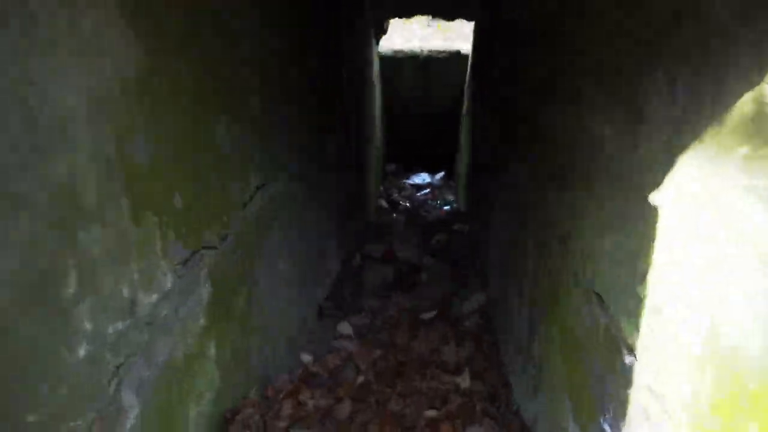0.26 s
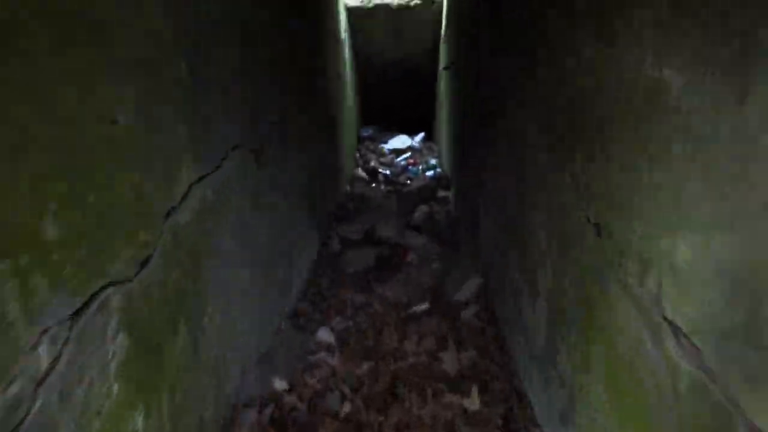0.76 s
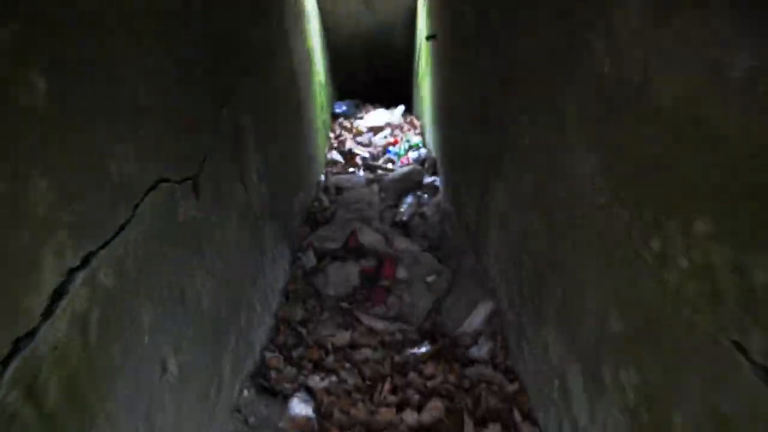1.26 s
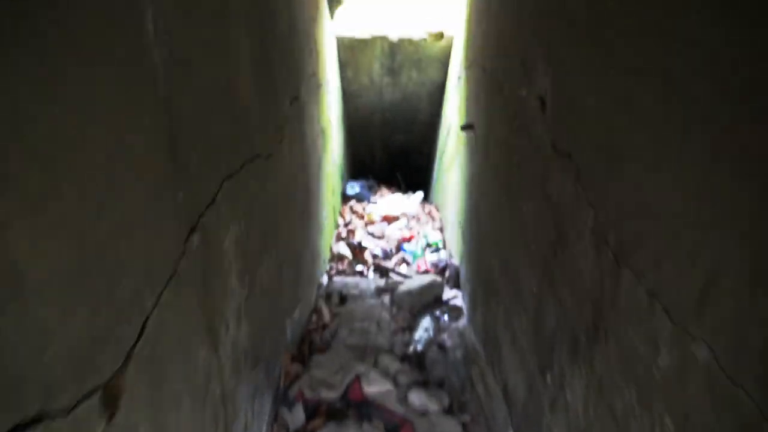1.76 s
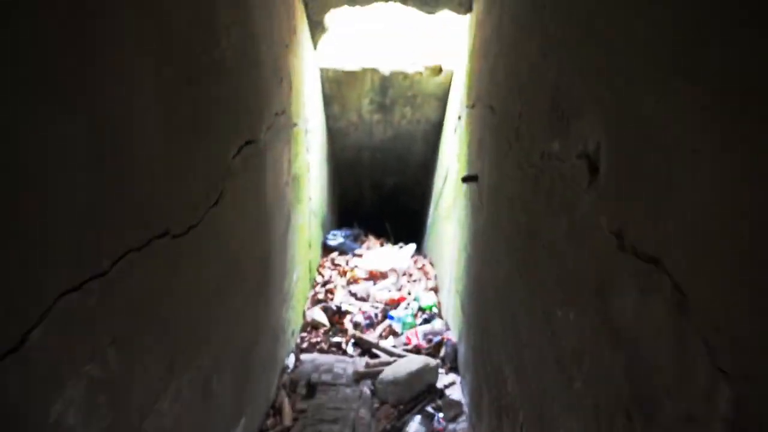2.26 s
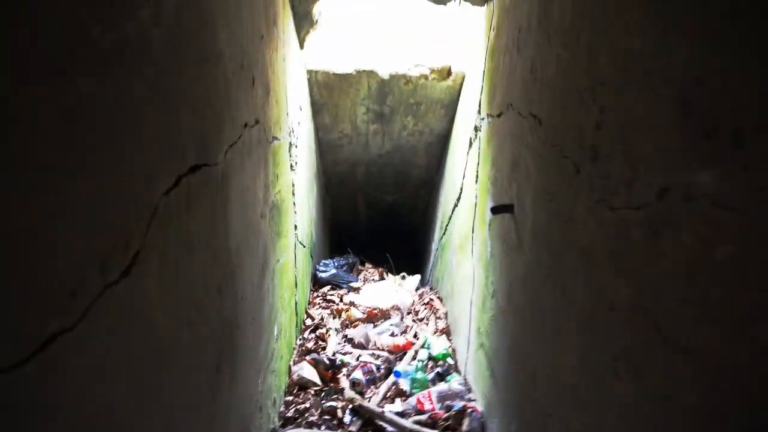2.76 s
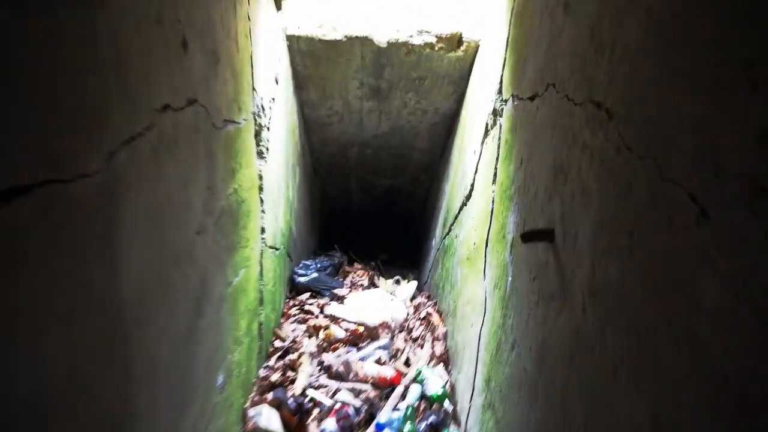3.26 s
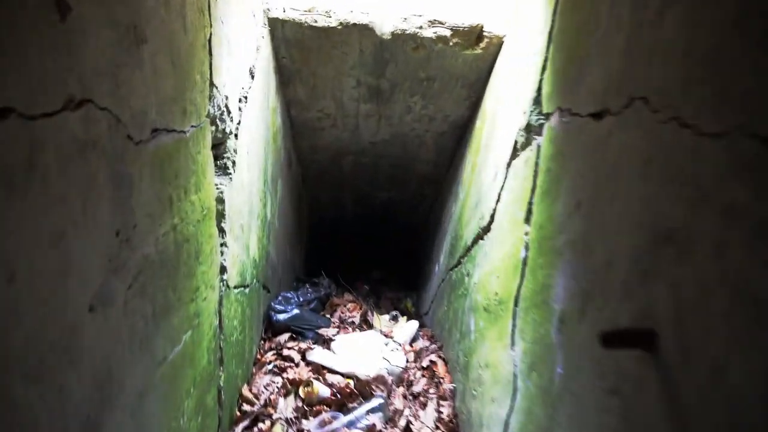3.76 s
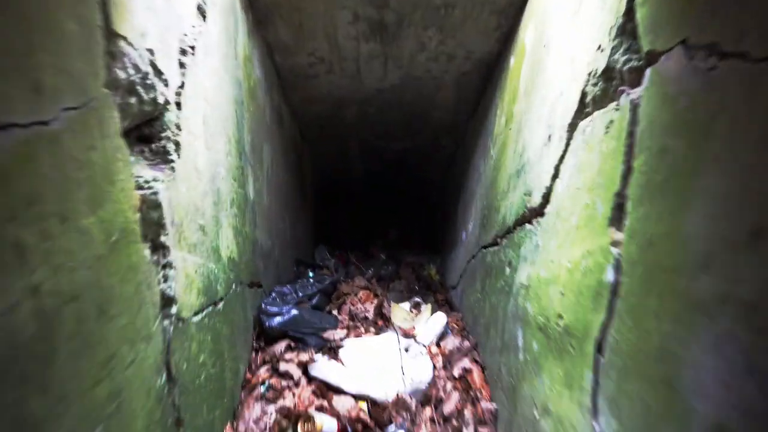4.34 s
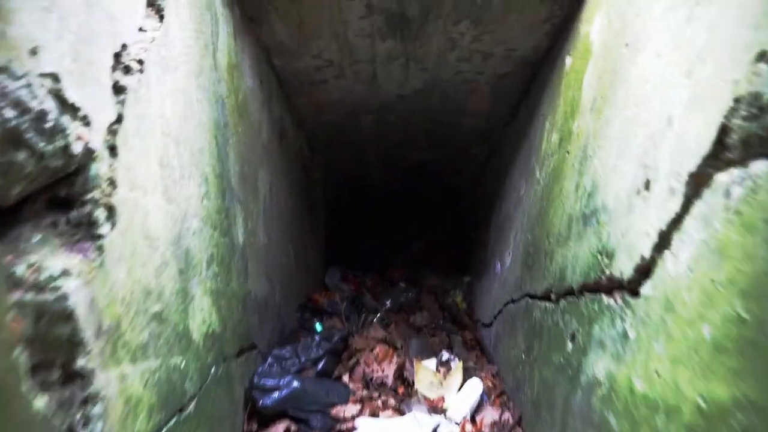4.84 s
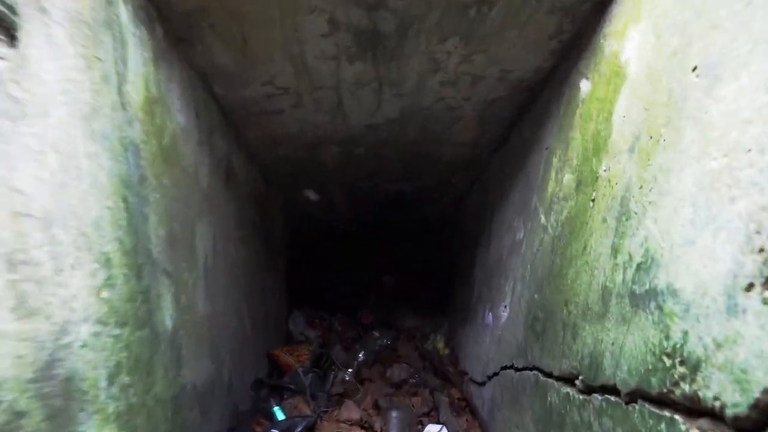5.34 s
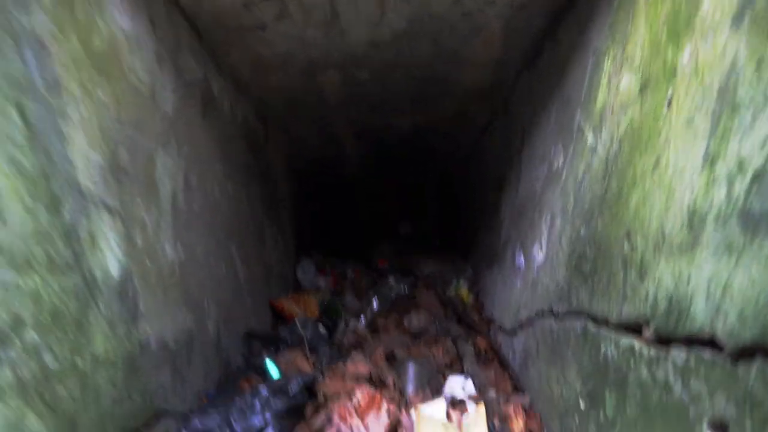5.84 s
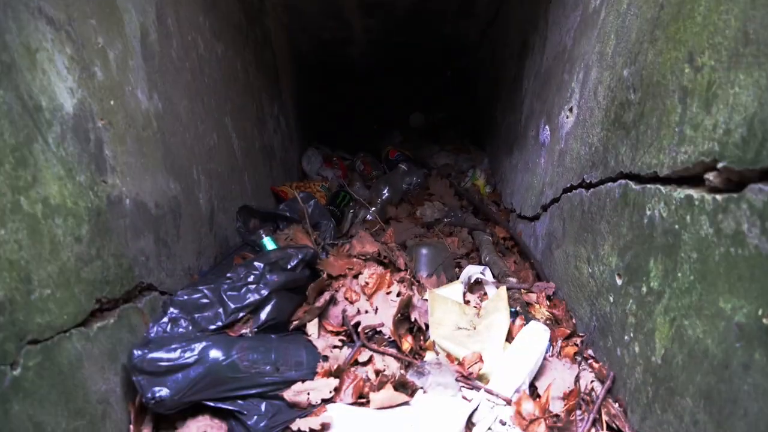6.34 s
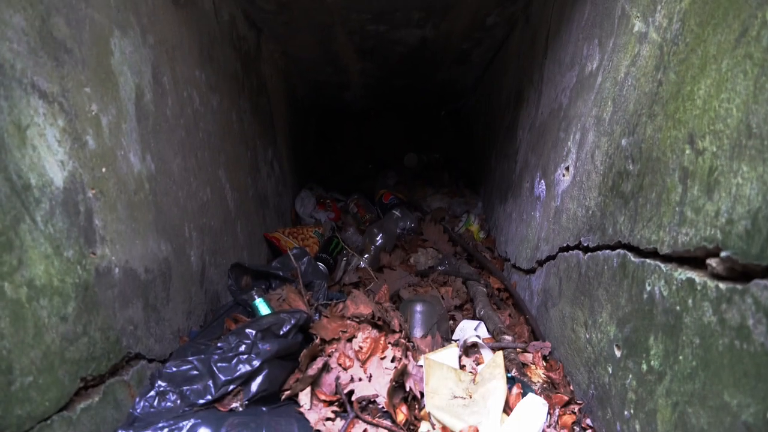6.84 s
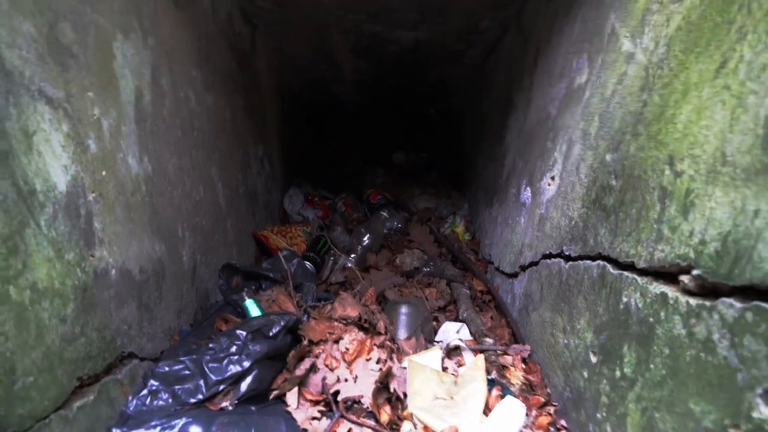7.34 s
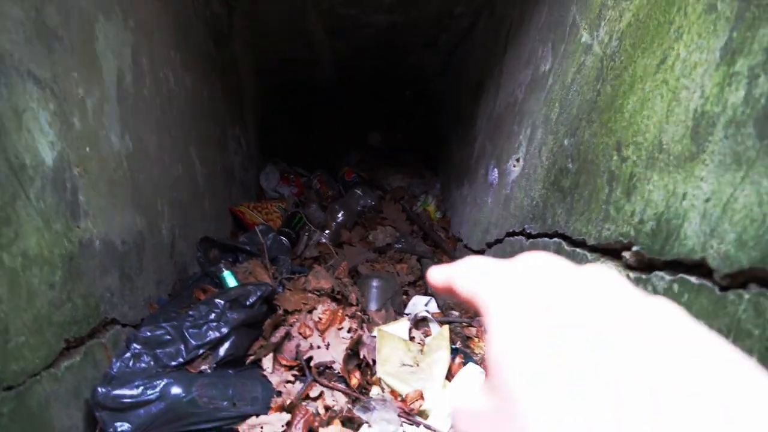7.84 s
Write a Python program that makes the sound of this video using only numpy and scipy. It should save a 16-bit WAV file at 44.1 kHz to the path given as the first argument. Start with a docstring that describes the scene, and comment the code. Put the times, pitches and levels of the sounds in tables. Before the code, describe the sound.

A person walks over leaf litter and trash between close concrete walls. Rustling builds to a continuous crackling wash, breaks into separate heavy crunches on rubble and plastic, with a clear glass clink among them, then dies to slight shifts. The microphone is near the feet; the tail is short, the air quiet, with barely perceptible low rumble.

```python
"""Footsteps wade through dry leaves and press on rubble and plastic litter in a narrow concrete passage.
Leaves and grit are dense trains of tiny ringing fractures whose level follows each movement of the feet;
heels are decaying noise thuds, snaps are noise bursts with damped modes, and a glass bottle is a modal sum.
The steps slow to small shifts near the end. A short tail gives the close walls; faint air and a very low
rumble at the microphone lie beneath, the same in both channels."""
import sys
import numpy as np
from scipy import signal
from scipy.fft import rfft, irfft
from scipy.io import wavfile
from scipy.ndimage import uniform_filter1d

SR = 44100
rng = np.random.default_rng(int(sys.argv[2]) if len(sys.argv) > 2 else 0)


def pcm_store(signal):
    """Save signal as 16-bit PCM."""
    levels = np.round(np.clip(np.atleast_2d(signal), -1, 1) * 32767)
    wavfile.write(sys.argv[1], SR, levels.astype(np.int16).T)


N = 355887
TIME = np.arange(N) / SR  # s

# Movements of the feet, from small shifts to full steps. Each row: start in seconds, pressing in, in seconds,
# pushing on in seconds, dying away as t60 in seconds, relative leaf level in dB, relative grit level in dB.
FOOT_MOVEMENTS = [(0.0, 0.11, .15, 0.56, -63, -50.5), (0.251, 0.011, 0.074, 0.5, -43.5, -47),
                  (.66, 0.022, 0.25, 0.75, -57, -59), (0.957, 0.022, 0.0039, 0.28, -33, -37),
                  (1.044, 0.02, 0.004, 0.47, -32, -36.5), (1.157, 0.0097, 0.011, 0.96, -35, -48.5),
                  (1.425, 0.018, 0.19, 0.37, -23, -37), (1.553, 0.031, 0.11, 0.8, -22.5, -31),
                  (1.963, .02, .085, 0.92, -19.5, -34.5), (2.12, 0.076, 0.042, 1.43, -20.5, -33.5),
                  (2.46, 0.062, 0.013, 3.8, -22.5, -38.5), (2.65, 0.082, 0.036, 0.13, -18.5, -24.5),
                  (2.77, 0.01, 0.019, 1, -28.5, -40), (3.005, 0.038, .02, .3, -30, -47),
                  (3.07, .014, 0.051, .27, -21.5, -19), (3.16, 0.031, 0.025, 0.43, -29.5, -25.5),
                  (3.3, 0.079, 0.034, 0.79, -35.5, -36.5), (3.668, .016, .028, 0.58, -26.5, -17.5),
                  (3.792, 0.035, 0.019, 0.28, -35.5, -29), (3.983, 0.026, 0.018, 0.28, -39.5, -31.5),
                  (4.06, 0.025, 0.051, 1.05, -44.5, -40.5), (4.239, 0.038, 0.013, 0.28, -28.5, -18.5),
                  (4.378, 0.012, 0.014, 0.65, -25.5, -25), (4.583, 0.0055, 0.0086, .25, -38, -29),
                  (4.871, 0.013, 0.022, 0.46, -26.5, -35.5), (5.035, 0.02, 0.093, 0.3, -30.5, -36.5),
                  (5.273, 0.0044, 0.018, 0.24, -42, -34), (5.41, 0.082, .01, .2, -44, -44.5),
                  (5.49, 0.033, 0.049, 0.34, -21.5, -19.5), (5.735, .012, 0.017, 1.7, -40.5, -53),
                  (5.924, 0.019, .025, 0.59, -30.5, -34), (6.061, 0.032, 0.061, 0.14, -42.5, -42),
                  (6.2, 0.025, 0.13, 2.4, -57.5, -58), (6.51, 0.034, .05, 0.63, -49, -53.5),
                  (6.78, 0.029, 0.047, 0.14, -56, -67), (6.95, 0.14, 0.044, 0.56, -49.5, -50.5),
                  (7.37, 0.0082, 0.067, 0.2, -52, -54.5), (7.768, .016, .07, 0.27, -50, -51)]
# Weight coming down on the heel. Each row: start in seconds, level in dB.
HEEL_STRIKES = [(.975, -36), (2.739, -45), (3.072, -16.5), (3.197, -21), (3.673, -28), (3.707, -25.5),
                (3.785, -24), (4.246, -20), (4.276, -19), (4.387, -22.5), (4.885, -27), (5.05, -41),
                (5.306, -30.5), (5.494, -19.5), (5.523, -15.5), (5.741, -26), (5.946, -31)]
# Stones, twigs and plastic that snap or knock. Each row: start in seconds, relative knock level in dB,
# knock pitch in Hz, relative crack level in dB.
SNAP_EVENTS = [(0.025, -31, 1100, -55), (.109, -29, 1180, -49), (.144, -46, 1600, -35.5),
               (.156, -26, 1110, -43.5), (.222, -26.5, 1190, -37), (.322, -20.5, 900, -43),
               (.3255, -14, 1300, -28.5), (.508, -54, 1480, -37), (.771, -31, 4200, -29.5),
               (.915, -22.5, 1500, -29.5), (0.979, -18.5, 910, -40), (1.0766, -11, 1045, -18.5),
               (1.165, -6.5, 935, -23.5), (1.232, -47.5, 1190, -27.5), (1.791, -17.5, 1550, -35),
               (3.0757, -2.5, 1430, -14), (3.088, -17.5, 1420, -23), (3.203, -24, 705, -16),
               (3.275, -10.5, 1750, -45), (3.338, -18.5, 1560, -33), (3.381, -12.5, 1400, -20),
               (3.711, -6.5, 597, -11), (3.856, -15, 1220, -27), (4.287, -25, 856, -25),
               (4.5895, -16.5, 940, -13), (5.522, -8, 656, -7), (5.532, -6, 900, -7.5),
               (5.557, -9, 1290, -10.5), (5.7347, -6, 1330, -19.5), (5.741, -3, 404, -10),
               (5.786, -19.5, 1560, -44.5), (5.858, -36, 1400, -30.5), (6.162, -31.5, 1220, -28.5),
               (6.225, -38, 7800, -49), (6.361, -42, 2760, -35.5), (6.42, -36.5, 2850, -43),
               (6.595, -42.5, 1000, -35), (6.807, -39.5, 3900, -40), (7.072, -48.5, 915, -29.5),
               (7.11, -37, 980, -38), (7.32, -55, 1990, -45), (7.385, -40, 2250, -35.5),
               (7.452, -37, 1130, -39), (7.547, -35.5, 1190, -37)]
# Modes of the glass bottle. Each row: frequency in Hz, relative level in dB when struck on the belly,
# relative level in dB when struck on the neck, t60 in seconds.
BOTTLE_MODES = [(2649, -9, -1, .21), (2890, -16, 3, .06), (3289, 0, -3, .26), (3775, -22, -15, .38),
                (5523, -23, -9, .16), (5846, -7, 0, .14), (6601, -2, -17, .15), (7040, -15, -3, .14),
                (7278, -19, -11, .17), (7526, -10, -18, .17), (7730, -21, -16, .22), (8980, -19, -15, .11),
                (9259, -3, -23, .08), (9615, -14, -22, .15), (10000, -12, -25, .1), (10560, -16, -27, .11),
                (11570, -18, -30, .1), (13080, -25, -23, .07)]
# Knocks on the bottle. Each row: start in seconds, level in dB, place from belly 0 to neck 1,
# scraping as a share of the first blow.
BOTTLE_KNOCKS = [(4.391, -27.5, 1, 0.97), (4.59, -9, 0.051, 0.24), (4.690, -29, 0.57, 0.77),
                 (5.276, -24, 1, 0.94), (5.303, -29.5, 1, 1)]
# Spectra of leaves, grit, heel thuds, cracks and still air.
# Each row: frequency in Hz, relative density in dB per Hz.
LEAF_SPECTRUM = [(100, -8.5), (250, -15), (550, -0.5), (850, -3.5), (1500, 3), (2400, 0.5), (3700, 3.5),
                 (7000, 3.5), (9500, 0), (13000, -3.5), (16000, -10.5)]
GRIT_SPECTRUM = [(80, -15), (200, -2.5), (520, 1), (850, 0.5), (1450, 0.5), (2100, -5), (3200, -5),
                 (6000, -10), (16000, -52.5)]
THUD_SPECTRUM = [(30, -10), (70, 4), (130, 3.5), (330, -2.5), (600, -3), (1200, -25.5), (3000, -19),
                 (16000, -91.5)]
CRACK_SPECTRUM = [(200, -13), (1000, -5), (3000, -1), (6500, -1.5), (10000, -13.5), (16000, -17.5)]
AIR_SPECTRUM = [(30, -22), (80, 2), (170, -3), (270, -8.5), (520, -15), (1000, -19), (3000, -30.5),
                (8000, -45), (16000, -53.5)]


def undb(db):
    """Level to amplitude: twenty decibels are a factor of ten."""
    return 10 ** (np.asarray(db) / 20)


def unit(x):
    """Normalisation to a root mean square of one."""
    return x / np.sqrt(np.mean(x ** 2))


def fade(t60, size):
    """Exponential damping: the level falls by 60 dB in t60 seconds."""
    return np.exp(-np.log(1000) * TIME[:size] / max(t60, 1 / SR))


def add(out, s, sound):
    """Superposition: a sound is summed into the mix from s seconds on."""
    i = max(int(s * SR), 0)
    out[i:i + len(sound)] += sound[:N - i]


def colour(x, points, size=4096):
    """Minimum-phase filtering: a folded cepstrum gives a causal response; white noise keeps its power."""
    hz, db = np.transpose(points)
    grid = np.maximum(np.fft.rfftfreq(size, 1 / SR), 1)
    gain = undb(np.interp(np.log(grid), np.log(hz), db))
    cepstrum = irfft(np.log(gain))
    # Fold negative time onto positive time.
    cepstrum[1:size // 2] *= 2
    cepstrum[size // 2 + 1:] = 0
    response = irfft(np.exp(rfft(cepstrum)))
    return signal.fftconvolve(x, response / np.linalg.norm(response))[:len(x)]


def grains(rate, spread_db, cycles, low_hz, high_hz, count=40, size=512):
    """Random fracture: tiny breaks, a few far stronger than the rest, each excite a brief resonance."""
    out = np.zeros(N)
    for hz in np.linspace(low_hz, min(high_hz, SR / 2), count):
        luck, strength = rng.random((2, N))
        breaks = luck < rate / count / SR
        kicks = np.zeros(N)
        kicks[breaks] = undb(spread_db * np.minimum(-np.log(strength[breaks]), 4))
        phase = rng.random()
        ring = fade(cycles / hz, size) * np.sin(2 * np.pi * (hz * TIME[:size] + phase))
        out += signal.oaconvolve(kicks, ring / np.linalg.norm(ring))[:N]
    return out


def play(x, db, size=2205):
    """Envelope control: a texture is levelled over 50 ms, then follows a level curve, keeping its fine grain."""
    power = np.abs(uniform_filter1d(x ** 2, size))
    floor = np.mean(x ** 2) / 10 ** 4
    return x * undb(db) / np.sqrt(power + floor)


def effort(step=44, resting_leaves_db=-64, resting_grit_db=-62.5, grit_release=0.87):
    """Power addition of movements: each presses in, pushes on and dies away, over a resting level.

    Returns how hard leaves are stirred and grit is ground, in dB.
    """
    t = TIME[::step]
    stir, grind = undb(resting_leaves_db) ** 2, undb(resting_grit_db) ** 2
    for s, attack_s, hold_s, t60, leaves_db, grit_db in FOOT_MOVEMENTS:
        press = np.clip((t - s) / max(attack_s, 1 / SR), 0, 1)
        release = np.log(1000) * np.maximum(t - s - attack_s - hold_s, 0) / t60
        stir = stir + (undb(leaves_db) * press * np.exp(-release)) ** 2
        # Grit comes to rest in this share of the leaves' time.
        grind = grind + (undb(grit_db) * press * np.exp(-release / grit_release)) ** 2
    return [np.interp(TIME, t, 10 * np.log10(power)) for power in (stir, grind)]


def patches(size=1100):
    """Random wander: uneven litter is a line drawn between random points with a spread of one."""
    points = unit(rng.standard_normal(N // size + 2))
    return np.interp(np.arange(N) / size, np.arange(N // size + 2), points)


def leaves(stir_db, busy_rate=30000, thinning=.5, gain_db=1):
    """Crackling: harder stirring breaks more leaves per second, so lone ticks merge into a rush."""
    rate = busy_rate * undb(thinning * (stir_db - stir_db.max()))
    crackle = grains(rate, spread_db=1.5, cycles=10.7, low_hz=544, high_hz=15100)
    return play(colour(crackle, LEAF_SPECTRUM), stir_db + gain_db)


def settling(stir_db, tick_rate=24, tick_t60=0.027, under_db=-1, most_db=-51, size=2048):
    """Elastic recovery: trodden leaves spring back in faint crinkles, capped so that they emerge at rest."""
    out = np.zeros(N)
    for when, pitch, strength in rng.random((int(tick_rate * N / SR), 3)):
        hz = 2400 * 3.5 ** pitch
        burst = fade(tick_t60, size) * rng.standard_normal(size)
        crinkle = colour(burst, [(hz / 5, -10), (hz, 0), (hz * 3, -10)])
        add(out, when * TIME[-1], undb(11.7 * strength ** 2) * crinkle)
    return unit(out) * undb(np.minimum(stir_db + under_db, most_db))


def grit(grind_db, busy_rate=4500, thinning=.4, gain_db=0.5):
    """Granular friction: crumbs of concrete and packed litter break and grind under the sole."""
    rate = busy_rate * undb(thinning * (grind_db - grind_db.max()))
    crunch = grains(rate, spread_db=3.0, cycles=2.57, low_hz=148, high_hz=4740)
    return play(colour(crunch, GRIT_SPECTRUM), grind_db + gain_db)


def heels(rise_s=0.0023, t60=0.25, size=22050):
    """Damped impact: each footfall squashes litter against the ground with a dull, lumpy thud."""
    out = np.zeros(N)
    push = fade(t60, size) * (1 - np.exp(-TIME[:size] / rise_s))
    for s, db in HEEL_STRIKES:
        add(out, s, undb(db) * push * rng.standard_normal(size))
    return colour(out, THUD_SPECTRUM)


def snaps(knock_t60=0.016, crack_t60=0.029, rise_s=0.0011, knock_db=6, crack_db=3, rattle=0.47, size=4096):
    """Brittle fracture: a sharp crack with quickly damped, inharmonic modes of the piece that gave way."""
    knocks, cracks = np.zeros(N), np.zeros(N)
    t = TIME[:size]
    yielding = 1 - np.exp(-t / rise_s)  # a piece breaks fibre by fibre, not all at once
    modes = [(.57, -0.37), (1, 0.69), (1.33, -0.27)]  # frequency ratio, amplitude
    for s, db, hz, sharp_db in SNAP_EVENTS:
        body = sum(weight * np.sin(2 * np.pi * hz * ratio * t) for ratio, weight in modes)
        scrape_spectrum = [(hz / 6, -16), (hz, 0), (hz * 2, -7), (hz * 8, -35)]
        scrape = unit(colour(rng.standard_normal(size), scrape_spectrum))
        knock = yielding * fade(knock_t60, size) * (body + rattle * scrape)
        crack = yielding * fade(crack_t60, size) * rng.standard_normal(size)
        add(knocks, s, undb(db + knock_db) * knock)
        add(cracks, s, undb(sharp_db + crack_db) * crack)
    return knocks + colour(cracks, CRACK_SPECTRUM)


def bottle(scrape_t60=0.18, chatter_hz=350, rise_s=0.001, rasp_db=-8, ring_s=0.2, size=17640):
    """Modal ringing: the striking place sets the balance of fixed glass modes.

    Scraping roughens the start, and the ring dies away quickly after about a fifth of a second.
    """
    out, t = np.zeros(N), TIME[:size]
    smooth = signal.butter(2, chatter_hz, fs=SR, output="sos")
    envelope = (1 - np.exp(-t / rise_s)) * np.exp(-(t / ring_s) ** 4)
    for s, db, place, scraping in BOTTLE_KNOCKS:
        contact = scraping * fade(scrape_t60, size)
        sound = undb(rasp_db) * contact * colour(rng.standard_normal(size), CRACK_SPECTRUM)
        for hz, belly_db, neck_db, t60 in BOTTLE_MODES:
            chatter = 1 + contact * unit(signal.sosfilt(smooth, rng.standard_normal(size)))
            mode_gain = undb(belly_db + place * (neck_db - belly_db))
            sound += mode_gain * chatter * fade(t60, size) * np.sin(2 * np.pi * hz * (t + s))
        add(out, s, undb(db) * sound * envelope)
    return out


def passage(x, tail_db=-12.0, low_t60=0.31, high_t60=0.14, split_hz=2500, build_s=0.00083, size=26460):
    """Reverberation: close walls crowd reflections into a short tail; leaves soak it up, the treble soonest."""
    low_pass = signal.butter(2, split_hz, fs=SR, output="sos")
    high_pass = signal.butter(2, split_hz, "high", fs=SR, output="sos")
    low = signal.sosfilt(low_pass, rng.standard_normal(size))
    high = signal.sosfilt(high_pass, rng.standard_normal(size))
    build = 1 - np.exp(-TIME[:size] / build_s)
    tail = (low * fade(low_t60, size) + high * fade(high_t60, size)) * build
    response = undb(tail_db) * tail / np.linalg.norm(tail)
    return x + signal.fftconvolve(x, response)[:N]


def background(air_db=-57, rumble_db=-24, rumble_low_hz=8, rumble_high_hz=18):
    """Stationary noise: still air, and a microphone rumble almost wholly below hearing."""
    air = colour(rng.standard_normal(N), AIR_SPECTRUM)
    band = signal.butter(3, [rumble_low_hz, rumble_high_hz], "band", fs=SR, output="sos")
    rumble = signal.sosfilt(band, rng.standard_normal(N))
    ease = signal.windows.tukey(N, .02)  # the rumble fades in and out at the ends
    return undb(air_db) * air + undb(rumble_db) * unit(rumble) * ease


def scene(patchy_db=1.13):
    """Superposition: steps echo in the passage; the bottle rings dry, without its tail; channels are equal."""
    stir_db, grind_db = effort()
    uneven_db = patchy_db * patches()  # thicker and thinner litter
    litter = leaves(stir_db + uneven_db) + settling(stir_db) + grit(grind_db + uneven_db)
    steps = litter + heels() + snaps()
    mono = passage(steps) + bottle() + background()
    return np.array([mono, mono])


def record(dry, top_hz=15900):
    """Clipping and band limiting: peaks beyond full scale are cut off, then the top of the spectrum."""
    low_pass = signal.ellip(10, .2, 80, top_hz, fs=SR, output="sos")
    return signal.sosfilt(low_pass, np.clip(dry, -1, 1))


dry = scene()
out = record(dry)
pcm_store(out)
```